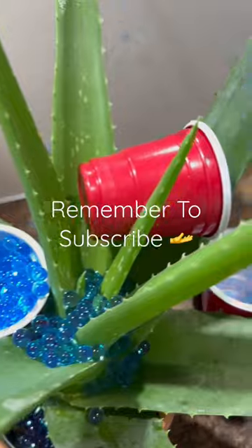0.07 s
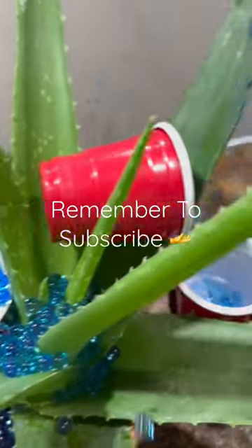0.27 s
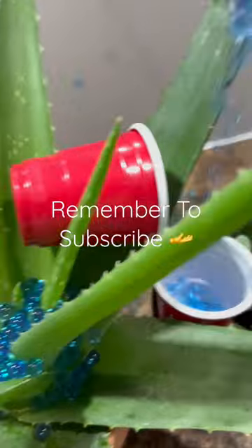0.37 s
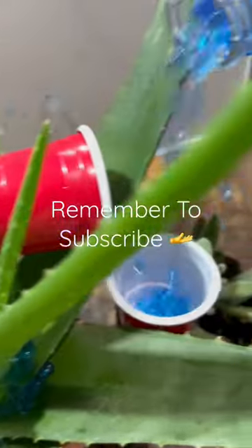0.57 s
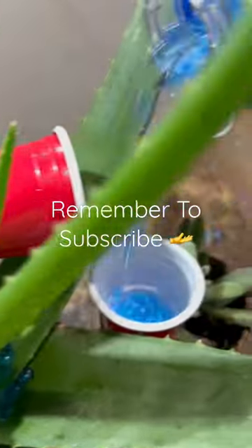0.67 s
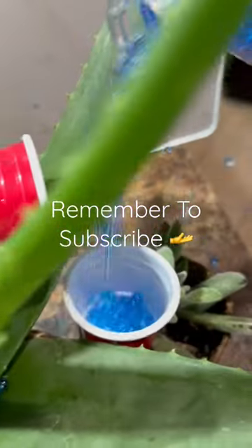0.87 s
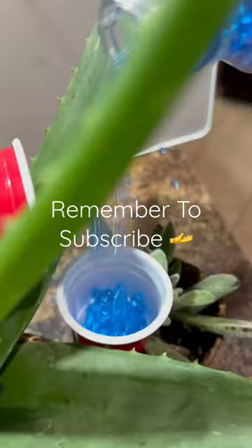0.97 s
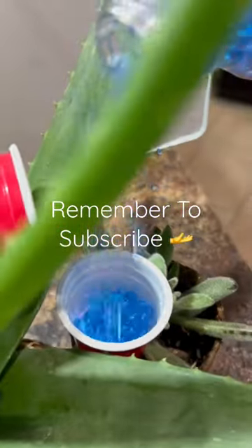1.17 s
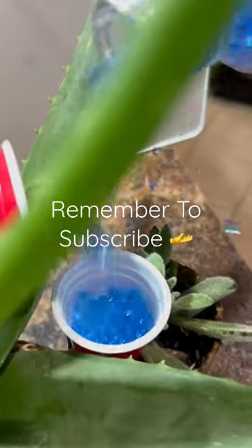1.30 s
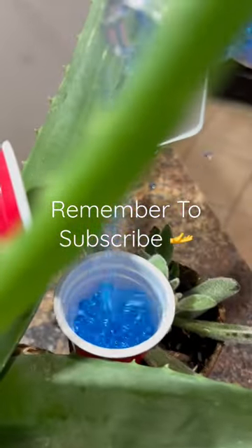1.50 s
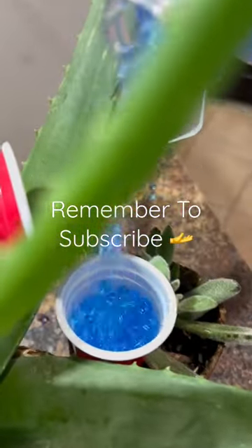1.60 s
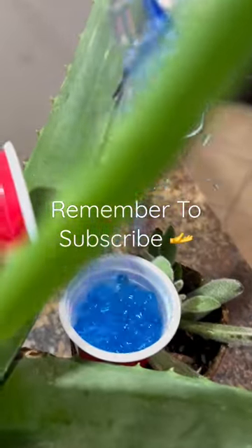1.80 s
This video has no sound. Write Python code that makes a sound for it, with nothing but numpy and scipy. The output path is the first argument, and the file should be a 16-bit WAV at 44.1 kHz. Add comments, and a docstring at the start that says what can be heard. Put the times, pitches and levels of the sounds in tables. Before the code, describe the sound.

Gel beads rattle into a plastic cup, softening to dull thuds as it fills.

```python
"""Gel beads poured into a cup

Wet gel beads pour from a bottle into a thin plastic cup among plant leaves, close by in a small room.
They knock on the cup and ring its hollow, floor and walls until the growing heap cushions them.
What stays is soft thuds and clacks on the heap and the ticking of wet skins. Stray beads plop on leaves."""
import sys
import numpy as np
from scipy import signal
from scipy.fft import rfft, irfft
from scipy.io import wavfile

SR = 44100
rng = np.random.default_rng(int(sys.argv[2]) if len(sys.argv) > 2 else 0)


def bounce(signal):
    """Save signal as a 16-bit WAV file at the path given by the first command-line argument."""
    frames = np.transpose(np.atleast_2d(signal))
    limited = np.clip(frames, -1, 1)
    pcm = np.round(limited * 32767).astype(np.int16)
    wavfile.write(sys.argv[1], SR, pcm)


N = 81585
TIME_S = np.arange(N) / SR


def amp(db):
    """Decibels to gain."""
    return 10 ** (np.asarray(db) / 20)


def unit(x):
    """Scale to rms 1."""
    return x / np.sqrt(np.mean(x ** 2) + 1e-20)


def read(points, hz):
    """Interpolate a table over log frequency."""
    f, value = np.transpose(points)
    return np.interp(np.log(hz + 1), np.log(f), value)


def add(mix, start_s, sound):
    """Mix a sound in at start_s."""
    part = mix[max(round(start_s * SR), 0):][:len(sound)]
    part += sound[:len(part)]


def colour(x, spectrum, size=4096):
    """Minimum-phase filter of unit energy; the spectrum sets shape only."""
    log_gain = np.log(amp(read(spectrum, abs(np.fft.fftfreq(size, 1 / SR)))))
    taps = np.fft.ifft(np.exp(np.conj(signal.hilbert(log_gain)))).real[:size // 2]
    return signal.fftconvolve(x, taps / np.linalg.norm(taps))[:len(x)]


def decay(t, t60_s):
    """Exponential fall, 60 dB per t60_s."""
    return np.exp(-np.log(1000) * t / t60_s)


def ring(hz, db, t60_s, build_s):
    """One mode: fast build-up, exponential decay."""
    t = np.arange(SR // 4) / SR
    return amp(db) * decay(t, t60_s) * (1 - np.exp(-t / build_s)) * np.sin(2 * np.pi * hz * t)


def burst(t60_s, build_s=0.002):
    """Noise splash with a soft front."""
    t = np.arange(SR // 10) / SR
    return rng.standard_normal(len(t)) * decay(t, t60_s) * (1 - np.exp(-t / build_s))


def shower(per_s, spread_db):
    """Randomly timed impacts of uneven size."""
    size = amp(spread_db * np.minimum(rng.exponential(1, N), 3))
    return size * rng.choice([-1, 1], N) * (rng.random(N) < per_s / SR)


def crackle(per_s, spread_db, t60_s):
    """Randomly timed tiny noise splashes, rms 1."""
    envelope = signal.lfilter([1], [1, -decay(1 / SR, t60_s)], abs(shower(per_s, spread_db)))
    return unit(envelope * rng.standard_normal(N))


# Rumble spectrum (frequency [Hz], level [dB])
RUMBLE_SPECTRUM = [(20, -17), (40, -13), (60, 4.5), (100, -1), (140, 5.5), (250, -2), (600, -11.5),
                   (1500, -23.5), (4000, -66), (11000, -44), (16000, -41)]


def rumble(level_db=-51):
    """Steady low noise of the room."""
    return amp(level_db) * unit(colour(rng.standard_normal(N), RUMBLE_SPECTRUM))


# Cup wall modes (frequency [Hz], level [dB], t60 [s])
LOWER_WALL_MODES = [(1707, 2.2, 0.037), (1740, 1.9, 0.032)]
UPPER_WALL_MODES = [(2633, 0, 0.039), (2701.6, 3, 0.029), (2818, 2, 0.016), (4040, -14, 0.029),
                    (5710, -18.5, 0.044)]


def cup(hollow_db, knock_db, lower_db, upper_db, hollow_hz, knock_hz, hollow_t60_s):
    """Cup response to one bead; the spot hit sets the mode levels and bends hollow and knock pitch."""
    out = ring(hollow_hz, hollow_db + 5, hollow_t60_s, build_s=0.002)
    out += ring(knock_hz, knock_db + 11, t60_s=0.025, build_s=0.002)
    for modes, wall_db in ((LOWER_WALL_MODES, lower_db), (UPPER_WALL_MODES, upper_db)):
        for hz, db, t60_s in modes:
            out += ring(hz, wall_db + db, t60_s, build_s=0.001)
    return out


# Hits on the cup, levels before fixed offsets (time [s], contact [dB], hollow [dB], floor knock [dB],
# lower wall [dB], upper wall [dB], hollow pitch [Hz], knock pitch [Hz], hollow t60 [s])
CUP_STRIKES = [(0.0347, -39, -46, -40, -66, -56, 948, 1035, 0.16),
               (0.0479, -59, -37, -43, -57, -43, 940, 1237, 0.16),
               (0.0654, -30, -44, -28, -49, -55.0, 954, 1140, 0.12),
               (0.1113, -50.0, -44, -55.0, -58, -39, 948, 1140, 0.13),
               (0.1391, -43, -41, -33.5, -54.0, -38, 962, 1060, 0.18),
               (0.1916, -36, -30, -43, -47, -33, 954, 1060, 0.1),
               (0.2285, -27.0, -37, -30.5, -28.5, -35.5, 890, 1073, 0.068),
               (0.2494, -50.0, -36.5, -48.5, -61, -43, 954, 1080, 0.19),
               (0.2575, -52, -30, -50, -40, -40.5, 928.5, 1050, 0.14),
               (0.266, -37, -24.5, -55.0, -33.5, -26.5, 922, 1328, 0.092),
               (0.2935, -32.5, -43, -40.0, -42, -37, 950, 1270, 0.096),
               (0.3185, -43, -39.5, -46, -41, -31.5, 943, 1060, 0.19),
               (0.367, -35.5, -36, -41, -39, -39.5, 958, 1250, 0.045),
               (0.4124, -26.5, -20.5, -30.5, -26, -31, 923, 1170, 0.11),
               (0.4244, -50.0, -25.5, -50, -36, -36, 932, 1350, 0.027),
               (0.4414, -33, -41, -33, -32.5, -35.5, 961, 1224, 0.07),
               (0.4624, -46, -38, -44, -50, -53, 964, 1032, 0.065),
               (0.4778, -29, -17, -28.5, -31, -32.5, 949, 1354, 0.038),
               (0.5004, -40, -28.5, -35, -42, -67, 984, 1285, 0.024),
               (0.5118, -33.5, -37, -33, -55.0, -60, 935, 1100, 0.11),
               (0.5235, -26, -37, -24, -35, -48, 937, 1040, 0.17),
               (0.5323, -31, -31, -33, -62, -47, 906, 1135, 0.065),
               (0.5453, -50.0, -33.5, -36, -40.5, -62, 969, 1030, 0.069),
               (0.555, -43, -28, -48, -61, -66, 980, 1100, 0.041),
               (0.5672, -44, -28, -36.5, -57, -62, 950, 1310, 0.046),
               (0.6526, -41, -40.5, -32.5, -41, -48, 940, 1069, 0.15),
               (0.6648, -33, -41.0, -35, -45, -46, 991, 1210, 0.11),
               (0.721, -35, -46.0, -32.5, -47, -49, 942, 1106, 0.12),
               (0.7701, -53, -38, -35, -33.5, -62, 905, 1135, 0.04),
               (0.785, -50.0, -32, -35.5, -42, -38, 920, 1175, 0.02),
               (0.823, -31, -36.0, -42, -48, -59, 939, 1100, 0.16),
               (0.8395, -33, -42.5, -46, -40, -50.0, 958, 1164, 0.13),
               (0.9384, -37, -37, -38, -44, -44, 940, 1210, 0.16),
               (0.9549, -42, -36.5, -48, -51, -37, 943, 1100, 0.14),
               (1.034, -39, -41.0, -40, -55.0, -48, 994, 1090, 0.08),
               (1.1646, -41, -49.5, -31, -50, -46, 931, 1178, 0.17),
               (1.2048, -38, -43, -46, -43.5, -48, 1020, 1130, 0.021),
               (1.268, -48, -47.5, -41, -57, -64, 944, 1104, 0.1)]
# Splatter and snap spectra (frequency [Hz], level [dB])
SPLATTER_SPECTRUM = [(100, -19.5), (400, -5), (750, 1), (1300, 0.5), (2200, -5), (2800, -17), (3300, -27),
                     (5000, -23), (10000, -32), (14000, -50)]
SNAP_SPECTRUM = [(600, -22), (1900, 3.5), (9000, -23)]


def strikes():
    """Beads hit bare plastic: slap, cup ring, wet splatter and snap."""
    rings, splatter, snaps = np.zeros((3, N))
    for start_s, contact_db, *cup_settings in CUP_STRIKES:
        slap = ring(hz=1378, db=contact_db + 8.5, t60_s=0.011, build_s=0.0005)
        add(rings, start_s, cup(*cup_settings) + slap)
        add(splatter, start_s, amp(contact_db - 2) * burst(t60_s=0.048))
        knock_db, lower_db = cup_settings[1:3]
        hardest_db = max(contact_db, knock_db, lower_db)
        add(snaps, start_s, amp(hardest_db - 8) * burst(t60_s=0.012, build_s=0.00047))
    return rings + colour(splatter, SPLATTER_SPECTRUM) + colour(snaps, SNAP_SPECTRUM)


# Pour levels (time [s], patter [dB], thuds [dB], ticks [dB], clacks [dB])
POUR_LEVELS = [(.04, -52.5, -46, -58, -56.5), (.27, -45.5, -44.5, -53.5, -45.5),
               (.39, -48.5, -47, -66.5, -47.5), (.55, -45.5, -45, -52, -50.5),
               (0.621, -48, -46, -58, -54.5), (0.942, -53, -48, -57.5, -44.5), (1.12, -57, -48.5, -63, -54),
               (1.35, -70.5, -48, -64, -57), (1.6, -71, -50, -66.5, -62.5), (1.85, -80, -50, -67, -61.5)]


def pour_gain(layer):
    """Gain of one layer over the course of the pour."""
    times_s, *levels_db = np.transpose(POUR_LEVELS)
    column = ("patter", "thuds", "ticks", "clacks").index(layer)
    return amp(np.interp(TIME_S, times_s, levels_db[column]))


def patter(per_s=380, spots=40):
    """Light rebounds ring the cup, fading as it fills."""
    out = np.zeros(N)
    for _ in range(spots):
        modes_db = np.array([-1.5, -2, -9, -3]) + 3 * rng.standard_normal(4)
        hollow_hz, knock_hz = rng.uniform(904, 995), rng.uniform(999, 1515)
        response = cup(*modes_db, hollow_hz, knock_hz, hollow_t60_s=0.05)[:SR // 12]
        out += signal.oaconvolve(shower(per_s / spots, spread_db=5), response)[:N]
    return unit(out) * pour_gain("patter")


# Thud and clack spectra (frequency [Hz], level [dB])
THUD_SPECTRUM = [(60, -30.5), (110, -2), (160, 1.5), (250, 1), (400, 2), (620, 1.5), (800, -11),
                 (1200, -54), (2500, -40)]
CLACK_SPECTRUM = [(300, -10.5), (700, -10.5), (1050, 13), (1200, 2), (1350, -6.5), (1600, -6), (1850, 6.5),
                  (2150, -7.5), (2700, -0.5), (3400, -11), (5000, -22.5), (8000, -24), (11500, -16),
                  (13500, -53)]
# Single clacks on the heap (time [s], level [dB])
HEAP_CLACKS = [(0.996, -39), (1.093, -59), (1.106, -35), (1.128, -39.5), (1.33, -40.5), (1.391, -43),
               (1.429, -42), (1.453, -35.5), (1.488, -45.5), (1.58, -42), (1.625, -45), (1.669, -45),
               (1.723, -54), (1.759, -45)]


def heap():
    """Beads land on beads and soil: soft thuds, small damped clacks."""
    thuds = unit(colour(shower(per_s=260, spread_db=2), THUD_SPECTRUM)) * pour_gain("thuds")
    clacks = crackle(per_s=480, spread_db=3.5, t60_s=0.011) * pour_gain("clacks")
    for start_s, db in HEAP_CLACKS:
        add(clacks, start_s, amp(db) * burst(t60_s=0.027))
    return thuds + colour(clacks, CLACK_SPECTRUM)


# Bead-on-bead ticks (time [s], level [dB], gain above the cutoff [dB])
WET_TICKS = [(0.065, -54, -25), (0.19, -35, -5), (0.211, -48, 10), (.265, -36, -25), (.318, -35.5, -22),
             (0.412, -37, -25), (0.436, -34.5, 3), (.478, -41, -12), (0.595, -39.5, -25), (0.722, -40, -18),
             (0.771, -49, -9), (0.787, -52, 5), (0.825, -44, -6), (0.937, -50, -25), (.954, -42, -25),
             (1.091, -43.5, 1), (1.162, -41.5, -8), (1.188, -39.5, -11), (1.267, -39.5, -6),
             (1.329, -47, -18), (1.486, -42.5, 3), (1.533, -45, 5), (1.579, -40, -12), (1.627, -41.5, -6),
             (1.668, -45, 0), (1.758, -45, -2)]
# Tick spectrum (frequency [Hz], level [dB])
TICK_SPECTRUM = [(1000, -22), (2000, 10), (3300, 0), (4200, -18.5), (4900, -6), (5700, -2.5), (6900, -4.5),
                 (7900, 5), (9000, 0), (11500, 5), (13000, 8.5), (16000, -3)]


def ticks(cutoff_hz=12100, trim_db=-3.5):
    """Wet skins touch and part: crackle and ticks, low-passed; a few ticks keep treble above that."""
    body = crackle(per_s=240, spread_db=5, t60_s=0.035) * pour_gain("ticks")
    treble = np.zeros(N)
    for start_s, db, treble_db in WET_TICKS:
        tick = amp(db + trim_db) * burst(t60_s=0.037)
        add(body, start_s, tick)
        add(treble, start_s, amp(treble_db) * tick)
    lowpass = signal.butter(16, cutoff_hz, "low", fs=SR, output="sos")
    highpass = signal.butter(16, cutoff_hz, "high", fs=SR, output="sos")
    return colour(signal.sosfilt(lowpass, body) + signal.sosfilt(highpass, treble), TICK_SPECTRUM)


# Soft landings (time [s], level [dB], pitch [Hz], t60 [s])
LEAF_PLOPS = [(.524, -32, 600, 0.084), (0.721, -30.5, 488, 0.05), (0.954, -28, 474, 0.022),
              (.993, -36.5, 573, 0.044), (1.034, -26.5, 332, 0.016), (1.105, -34, 484, 0.036),
              (1.165, -36.5, 428, 0.065), (1.356, -38.5, 146, .09), (1.43, -41, 580, 0.072),
              (1.451, -26.5, 525, 0.011), (1.5003, -23.5, 1040, 0.0084), (1.5012, -22.5, 620, 0.01),
              (1.502, -21.5, 331, 0.023), (1.512, -28.5, 183, 0.056)]


def plops():
    """Stray beads land on thick leaves and the gel heap, ringing damped modes."""
    out = np.zeros(N)
    for start_s, db, hz, t60_s in LEAF_PLOPS:
        add(out, start_s, ring(hz, db, t60_s, build_s=0.00054))
    return out


# Phase between ports (frequency [Hz], left lead [rad])
PORT_LEAD = [(50, 0), (550, .25), (800, -.15), (1300, .15), (2050, 0), (2400, -1.1), (2500, -3.9),
             (2750, -5.4), (2870, -3.1), (3100, -3.1), (3300, -1.4), (3900, -.4), (4550, -1), (5000, -3.1),
             (5200, -5.1), (5900, -6.3), (7400, -6.3), (8200, -7.2), (10500, -8), (12500, -9.2),
             (16000, -9.4)]
# Balance between ports (frequency [Hz], left minus right [dB])
PORT_LEVEL = [(200, 0), (700, 4), (930, -1), (1150, -4.5), (1400, 0.5), (2150, -2), (2500, -3),
              (2850, -5.5), (3300, 4), (4200, 1.5), (6000, 1), (16000, -0.5)]


def ports(x, taper_hz=420):
    """Direct sound reaches two microphone ports with unequal phase and level."""
    hz = np.fft.rfftfreq(2 * N, 1 / SR)
    lead_rad = read(PORT_LEAD, hz) * np.minimum(hz / taper_hz, 1)  # bass tends to mono
    left = amp(read(PORT_LEVEL, hz) / 2) * np.exp(0.5j * lead_rad)
    return irfft(rfft(x, 2 * N) * np.array([left, 1 / left]))[:, :N]


def room(x, level_db=-13.5, t60_s=0.16, predelay_s=0.004):
    """Short, faint reverberation, independent on each side."""
    t = np.arange(SR // 2) / SR
    tail = rng.standard_normal((2, len(t))) * decay(t, t60_s) * (t > predelay_s)
    return amp(level_db) * signal.fftconvolve(x[None], tail / np.linalg.norm(tail[0]), axes=1)[:, :N]


# Cup position (time [s], left minus right [dB])
CUP_BALANCE = [(0, -1.5), (.5, 0), (1.2, 3)]


def scene():
    """Beads over room rumble; the cup drifts right to left, some ticking comes from all around."""
    plastic = strikes() + patter()
    soft = heap() + plops() + ticks()
    pan_db = np.interp(TIME_S, *np.transpose(CUP_BALANCE))
    direct = amp([pan_db / 2, -pan_db / 2]) * ports(plastic) + ports(soft + rumble())
    diffuse_ticks = amp(-8.5) * np.array([ticks(), ticks()])
    return direct + diffuse_ticks + room(plastic + soft)


def record(dry):
    """Brief silence, fast fade-in, low-pass."""
    start_s, fade_s, cutoff_hz = 0.034, 0.002, 16000
    fade_in = np.clip((TIME_S - start_s) / fade_s, 0, 1)
    lowpass = signal.firwin(511, cutoff_hz, window=("kaiser", 9), fs=SR)
    return signal.oaconvolve(dry * fade_in, lowpass[None], "same")


dry = scene()
out = record(dry)
bounce(out)
```